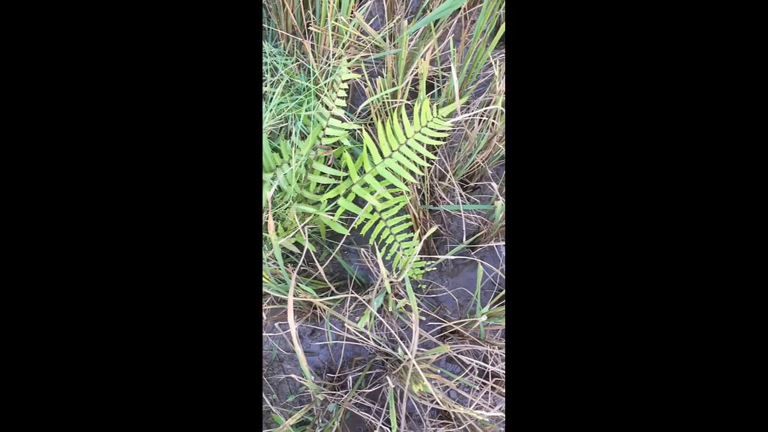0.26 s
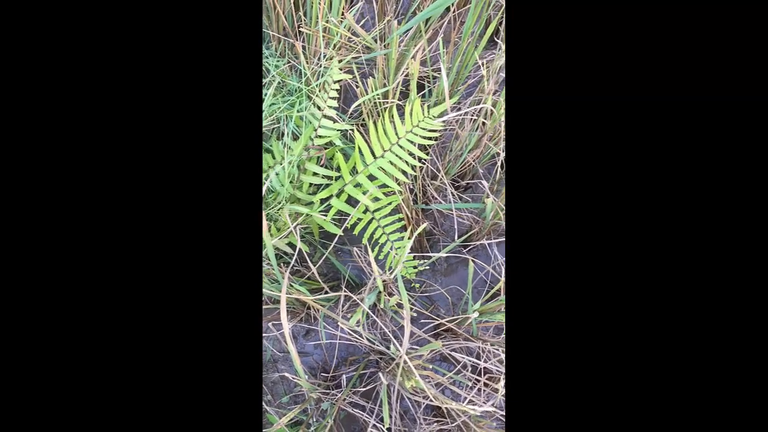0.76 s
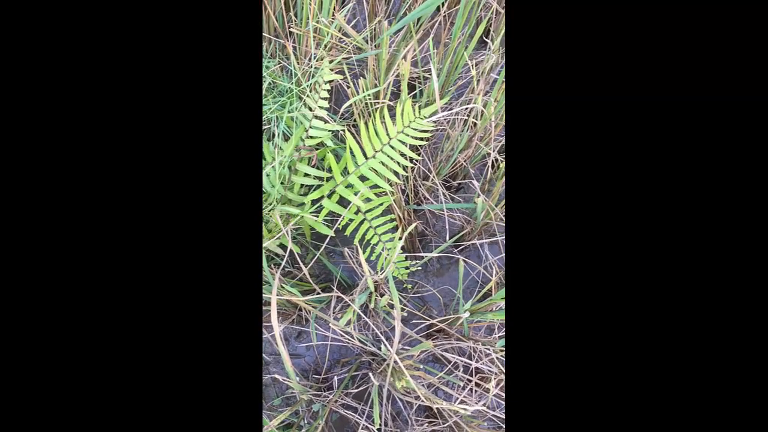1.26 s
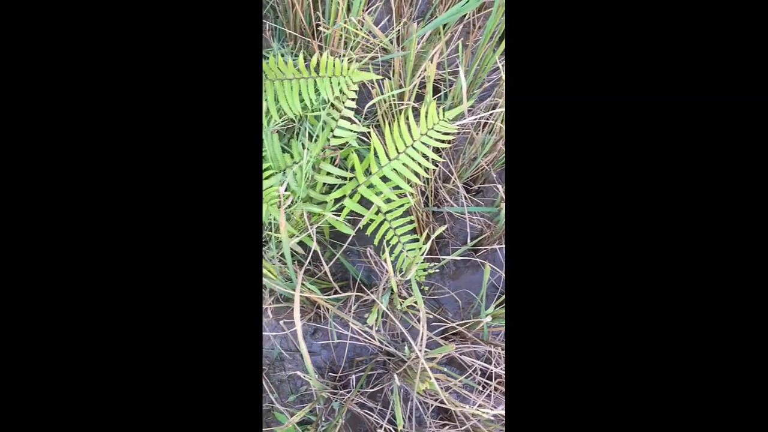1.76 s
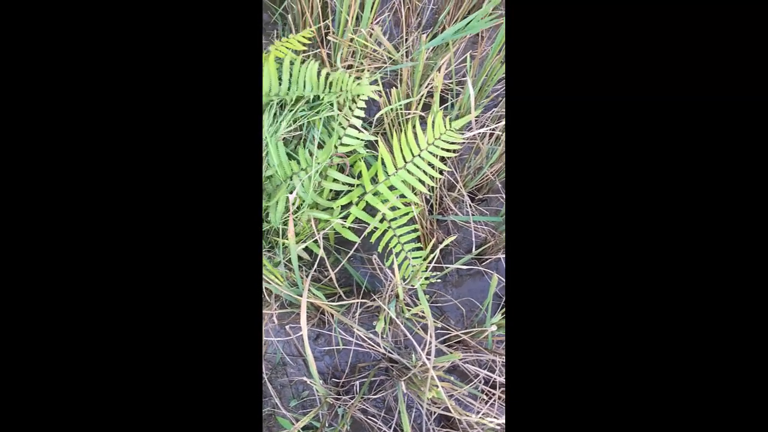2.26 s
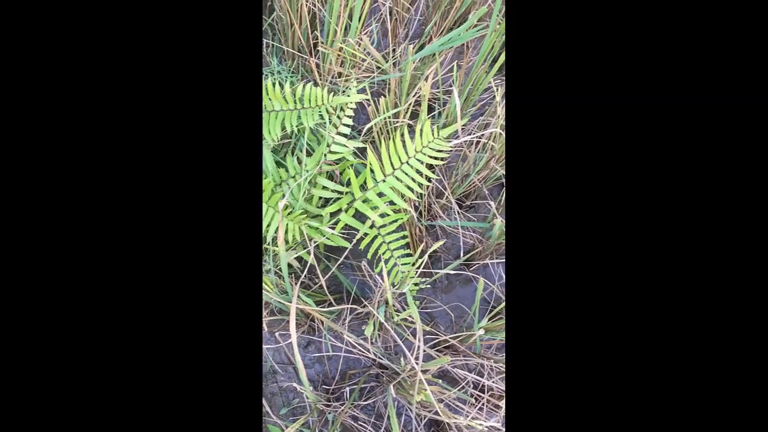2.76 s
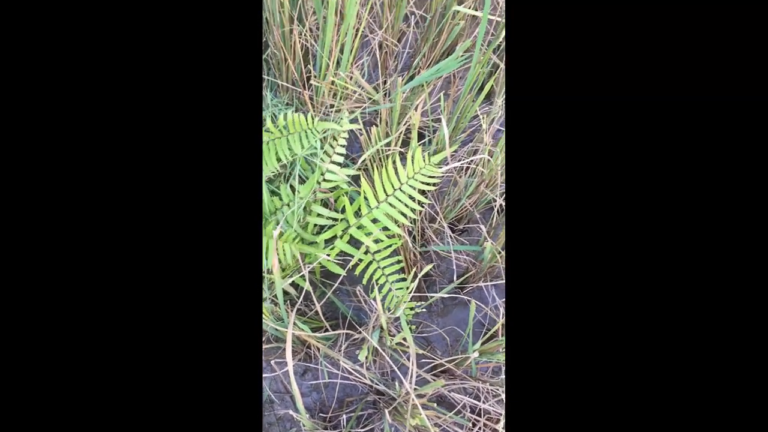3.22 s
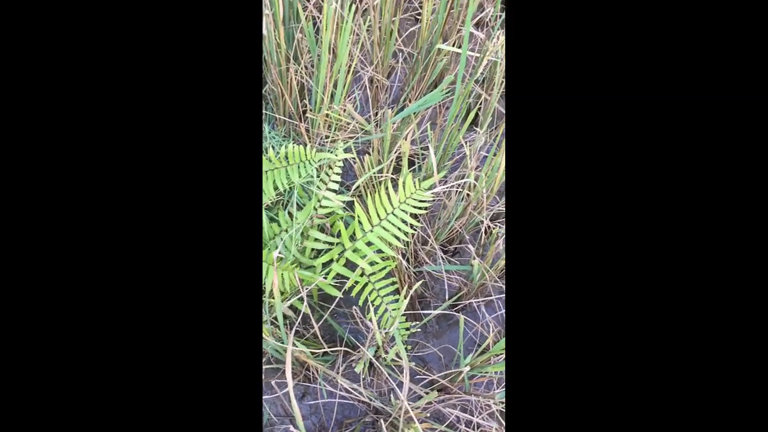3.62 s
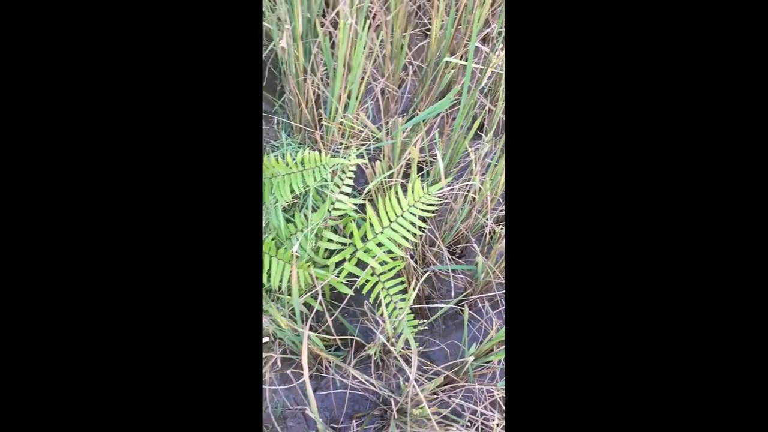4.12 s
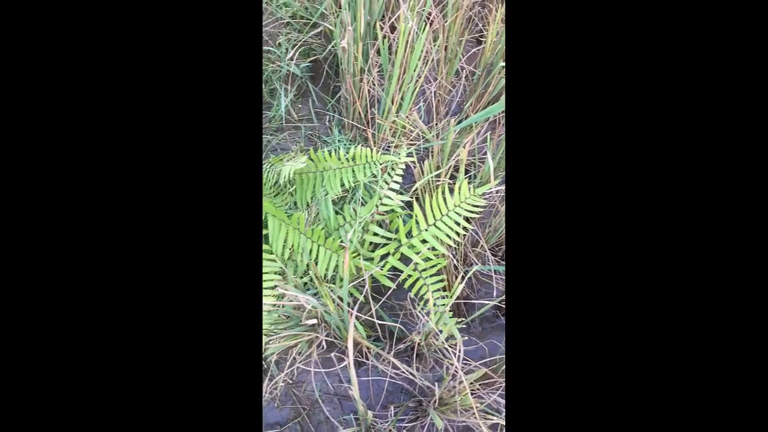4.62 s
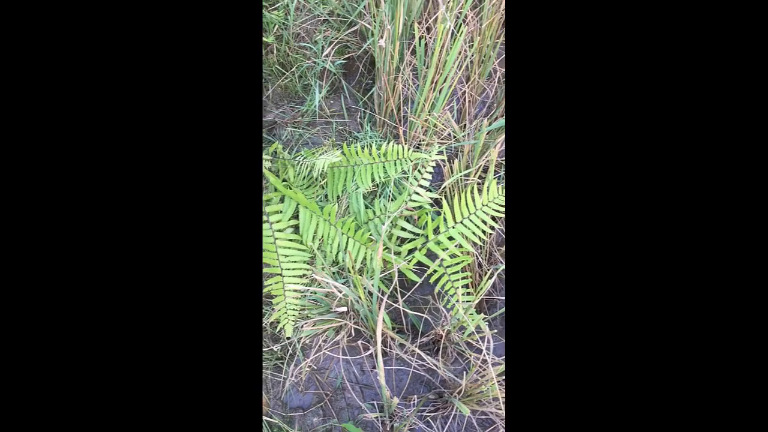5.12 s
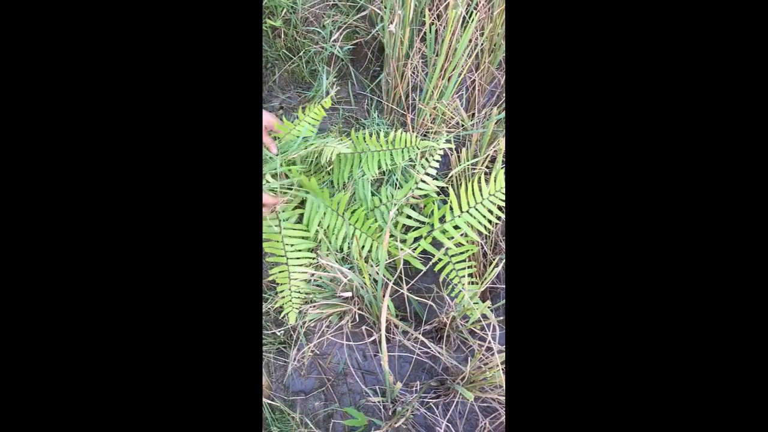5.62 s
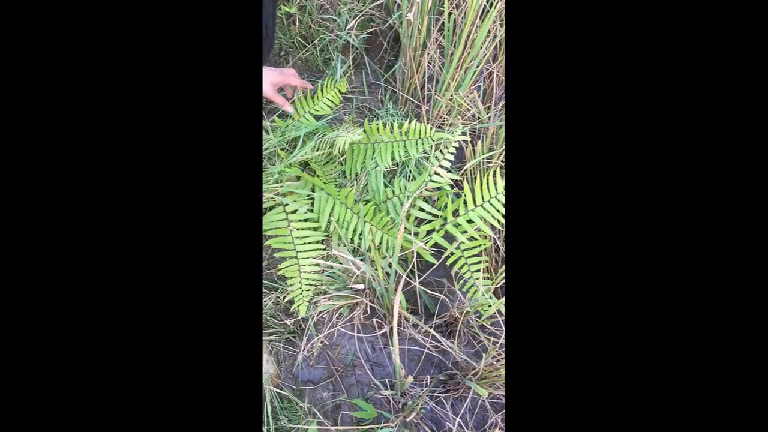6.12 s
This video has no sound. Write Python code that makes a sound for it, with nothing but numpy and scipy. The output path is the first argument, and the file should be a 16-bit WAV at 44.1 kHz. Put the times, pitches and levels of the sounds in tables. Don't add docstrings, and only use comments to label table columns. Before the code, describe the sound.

A quiet wet field, heard close on a mono phone microphone: faint steady hiss and thin, very high cricket chirps. From about 0.2 s hands brush leaves with light ticks, the scraping growing by 0.5 s. Between 0.7 and 0.95 s a tight cluster of sharp stalk cracks, leafy swish, low knocks and muddy gulps forms the first plunge. From 1.2 to 2.8 s there are softer rustles, separate dry snaps and small plops, with a swish near 2.0. Around 2.5 s a cricket starts paired chirps, clearest near 4 s; 2.9 to 4 s is calmer, with bubbles popping. A sharp crack at 4.1 s leads into the longest crunch, 4.2 to 4.7 s, full of snapping stalks, hollow mud knocks, gulps and plops. After 4.8 s motion fades; a bright click and pop at 5.2 s, then sparse drips, trickle, faint brushing and crickets to 6.4 s.

```python
import sys
import numpy as np
from scipy import signal
from scipy.fft import rfft, irfft, next_fast_len
from scipy.io import wavfile
from scipy.ndimage import uniform_filter1d

SR = 44100
rng = np.random.default_rng(int(sys.argv[2]) if len(sys.argv) > 2 else 0)


def volts(x):
    e = np.asarray(x, float) / 20
    return 10 ** e


def transcribe(u):
    v = np.clip(np.atleast_2d(u).T, -1, 1)
    q = np.round(v * 32767).astype(np.int16)
    wavfile.write(sys.argv[1], SR, q)


N = 281358
T = np.arange(N) / SR


def level(x, db):
    return x * volts(db) / np.sqrt(np.mean(x ** 2))


def colour(x, points):
    hz, db = np.transpose(points)
    size = next_fast_len(N)
    log_hz = np.log(np.arange(size // 2 + 1) * SR / size + 1)
    gain = volts(np.interp(log_hz, np.log(hz), db))
    return irfft(rfft(x, size) * gain, size)[:N]


def band(x, lo_hz, hi_hz):
    edges_hz = [lo_hz, min(hi_hz, SR / 2.1)]
    return signal.sosfilt(signal.butter(2, edges_hz, "band", fs=SR, output="sos"), x)


def walk(rate):
    hold = int(SR / rate)
    held = np.repeat(rng.standard_normal(size=600), hold)[:N]
    return np.sqrt(2) * uniform_filter1d(uniform_filter1d(held, hold), hold)


def slips(rate, spread_db, t60):
    strength_db = spread_db * np.minimum(rng.exponential(size=N), 2.8)
    starts = (rng.random(N) < rate / SR) * volts(strength_db)
    decay = 1000 ** (-1 / (t60 * SR))
    return level(signal.lfilter([1], [1, -decay], starts), 0)


def add(out, s, sound):
    i = max(int(s * SR), 0)
    out[i:i + len(sound)] += sound[:N - i]


def field():
    # hz, density_db [dB per Hz]
    hiss_points = [(18, -41), (30, 3.5), (124, -3), (392, -11), (775, -16.5), (1210, -5), (1380, -7),
                   (5680, -36), (7200, 0.5), (7990, -13), (8870, -17), (10400, -17.5), (15800, -13)]
    hiss = colour(rng.standard_normal(N), hiss_points)
    return level(hiss * volts(1.5 * walk(3.24)), -64)


def stroke(hz, length, arch_hz, rough):
    u = np.linspace(0, 1, int(length * SR))
    pitch_hz = hz - arch_hz * (2 * u - .92) ** 2
    teeth = 1 + rough * 11.0 * uniform_filter1d(rng.standard_normal(size=4000), size=40)[:len(u)]
    swell = np.sin(np.pi * u ** 0.85) ** 0.41
    return np.sqrt(2) * swell * teeth * np.sin(2 * np.pi * np.cumsum(pitch_hz) / SR)


def paired_cricket(out):
    # time_s, level_db
    pair_level = [
        (2.5, -62),
        (3.3, -59),
        (3.8, -53.5),
        (4.15, -51.5),
        (4.7, -56),
        (5.0, -54.5),
        (5.4, -57.5),
        (6.3, -60),
    ]
    times_s, levels_db = np.transpose(pair_level)
    start_s, every_s, gap_s = 2.536, .309, .078
    for k in range(26):
        second = k % 2
        s = start_s + every_s * (k // 2) + gap_s * second
        db = np.interp(s, times_s, levels_db) + 4.0 + 0.86 * second
        add(out, s - .014, volts(db) * stroke(7235, 0.031, 165, 0.12))


def single_chirps(out):
    chirps = {7430: [(.073, -62), (.02, -70), (0.171, -62), (.339, -58), (3.339, -78), (3.419, -66),
              (3.46, -73), (3.509, -69), (3.607, -70), (3.654, -62), (3.695, -63), (3.825, -56),
              (5.169, -65), (5.359, -75), (5.561, -69), (5.75, -61), (5.976, -63), (6.129, -64),
              (6.167, -60.5), (6.355, -65), (3.872, -66), (5.022, -67), (5.21, -75), (5.395, -66),
              (5.785, -67), (6.315, -72)], 7760: [(.084, -69), (.125, -60), (3.363, -68), (3.5, -67),
              (3.54, -61.5), (3.715, -65), (3.755, -74)]}
    for hz, rows in chirps.items():
        for s, db in rows:
            add(out, s - .013, volts(db + 1.5) * stroke(hz, 0.031, 60, .3))


def trills():
    # start_s, end_s, level_db
    trill_rows = [
        (0.03, 0.167, -63),
        (3.38, 3.458, -62),
        (3.56, 3.697, -63.5),
        (3.794, 3.9, -58),
        (5.44, 5.5, -75),
        (2.915, 2.995, -62),
        (6.13, 6.184, -71),
        (6.274, 6.42, -76),
    ]
    gate, bend_hz = np.zeros((2, N))
    for start, end, db in trill_rows:
        across = (2 * T - start - end) / (end - start)
        gate += volts(db) * np.sqrt(np.clip(1. - across ** 2, 0, 1))
        bend_hz += (T > start) * (T < end) * 800 * (T - (start + end) / 2)
    wing = 2 * np.pi * 66.0 * T + 1.1
    beats = np.clip(np.sin(wing) + 0.5, 0, None) ** 0.89
    pitch_hz = 9090 + bend_hz + 120 * np.cos(wing) + 40 * walk(65)
    return 2.1 * gate * beats * np.sin(2 * np.pi * np.cumsum(pitch_hz) / SR)


def crickets():
    out = np.zeros(N)
    paired_cricket(out)
    single_chirps(out)
    out += trills()
    far = level(band(rng.standard_normal(N), 8550, 9150), 0)
    out += volts(-73.0 + 2.2 * walk(14)) * far
    tail = rng.standard_normal(size=3000)
    tail *= np.exp(-T[:len(tail)] / 0.045)
    return out + volts(-36.5) * signal.fftconvolve(out, tail)[:N]


def pushes(base_db, s, db, rise, fall):
    t = T[::64, None]
    before = (s - t) / np.maximum(rise, .01)
    after = (t - s) / np.maximum(fall, .01)
    push_db = db - 10 * np.maximum(before, after)
    push_power = np.interp(T, t[:, 0], volts(2 * push_db).sum(axis=1))
    return 10 * np.log10(volts(2 * base_db) + push_power)


def hands():
    # time_s, effort_db, height_db (thin blades over fronds)
    drag = [(.1, -64.5, -6.5), (.32, -57, 6.5), (.52, -43.5, 0.5), (.7, -40, 0), (.77, -50, 3),
            (1.35, -47.5, 1), (1.88, -59.5, -0.5), (2.3, -51, -0.5), (2.84, -54, -1), (2.92, -68, 0.5),
            (3.25, -62, -2), (3.5, -68.5, 0.5), (3.7, -64, 3.5), (3.92, -50.5, 4), (4.24, -44.5, 0.5),
            (5.04, -70, 5), (5.7, -69, 4.5), (6.1, -69.5, 2)]
    # peak_s, level_db, rise_s, fall_s (both over 10 dB)
    brushes = [(.227, -44, 0.033, 0.037), (.383, -53.5, 0.049, 0.23), (.515, -42.5, 0.1, 0.042),
               (.718, -46.5, 0.14, 0.077), (0.915, -35, 0.065, 0.067), (.966, -33, 0.092, 0.049),
               (1.237, -48.5, 0.37, 0.092), (1.493, -45.5, 0.092, 0.066), (1.656, -51.5, 0.12, 0.23),
               (1.783, -48, 0.01, 0.11), (1.981, -40.5, 0.045, 0.062), (2.111, -39.5, 0.063, 0.042),
               (2.168, -42.5, .015, 0.013), (2.291, -45, 0.13, 0.055), (2.983, -52, 0.011, 0.011),
               (2.574, -46.5, 0.03, 0.027), (2.692, -43, 0.041, 0.037), (2.858, -50, 0.028, .03),
               (3.033, -51, 0.064, 0.1), (3.117, -45, 0.051, 0.086), (3.304, -53, 0.076, 0.026),
               (4.306, -37, 0.032, 0.13), (4.398, -42, 0.27, 0.072), (4.61, -44, 0.17, 0.17),
               (4.821, -55, .15, 0.17), (5.14, -59.5, 0.023, 0.23), (5.22, -57.5, 0.14, 0.083),
               (5.543, -57, 0.18, 0.44), (5.859, -53.5, 0.076, 0.23), (6.03, -54.5, 0.036, 0.066),
               (6.202, -57.5, 0.041, 0.015), (4.945, -56.5, 0.07, 0.021)]
    # peak_s, mud_db, bent_stalks_db, rise_s, fall_s
    plunges = [(.515, -63.5, -54.5, 0.24, 0.13), (.914, -44, -40, 0.064, 0.08),
               (.966, -60, -48, .05, 0.054), (2.291, -68, -55, 0.053, 0.11),
               (3.195, -67, -57, 0.048, 0.017), (4.19, -72, -74, 0.16, 0.11),
               (4.306, -51.5, -61, 0.04, 0.1), (4.398, -66, -39, 0.058, 0.049),
               (4.61, -66, -46.5, 0.12, 0.12), (4.645, -64, -66, .03, .04), (6.03, -71, -60, 0.041, 0.15)]
    drag_s, effort_db, height_db = np.transpose(drag)
    scrape_db = pushes(np.interp(T, drag_s, effort_db), *np.transpose(brushes))
    blade_db = scrape_db + np.interp(T, drag_s, height_db)
    s, mud_db, bent_db, rise, fall = np.transpose(plunges)
    carried_db = 10 * np.log10(volts(2 * (scrape_db - 12.5)) + volts(2 * -67))
    stalk_db = pushes(carried_db, s, bent_db, rise, fall)
    push_db = pushes(-74, s, mud_db, rise, fall)
    return scrape_db, blade_db, stalk_db, push_db


def leaves(scrape_db, blade_db, stalk_db):
    # hz, density_db [dB per Hz]
    leaf_points = [(180, -48), (300, -33), (633, -14), (747, -16), (1430, -12), (2020, -3), (3790, 0),
                   (9140, -1.5), (15000, -5.5), (15800, -4)]
    shared, drag, out = slips(300, 4.3, 0.045), walk(33.0), 0
    for hz in 500 * 2 ** np.arange(0, 5.3, .5):
        grain = 0.75 + 0.44 * shared + 0.17 * slips(460, 0.47, 0.0081)
        patch_db = 0.11 * drag + 1.33 * walk(24.93)
        octave = np.log2(hz)
        to_stalk = np.clip(np.log2(2000) - octave, 0, 1)
        to_blade = np.clip(octave - np.log2(5500), 0, 1)
        db = scrape_db + to_stalk * (stalk_db + 13.0 - scrape_db)
        db = db + to_blade * (blade_db + 2.0 - scrape_db)
        rough = rng.standard_normal(N) * grain * volts(patch_db)
        out = out + band(rough, hz / 2 ** 0.27, hz * 2 ** 0.27) * volts(db)
    return volts(3.5) * colour(out, leaf_points)


def mud(push_db):
    lumps = rng.standard_normal(N) * (0.93 + 0.25 * slips(46, 2.4, 0.016))
    return level(band(lumps, 36, 480), -0.61) * volts(push_db)


def droplets(motion_db, low_hz, octaves, turns, gain_db, count):
    out, t = np.zeros(N), np.arange(int(.035 * SR)) / SR
    for when, where, rank in rng.random(size=(count, 3)):
        hz = low_hz * 2 ** (octaves * where)
        db = motion_db[int(when * N)] + gain_db - 5.6 * np.log(rank + 0.063)
        age = t * hz / turns
        ring = np.sin(2 * np.pi * hz * t * (1 + 0.99 * t))
        add(out, when * N / SR, volts(db) * age * np.exp((1 - age ** 2) / 2) * ring)
    return out


def wet_growth(scrape_db, blade_db, stalk_db, push_db):
    frond_db = np.minimum(scrape_db, -42)
    drops = droplets(frond_db, low_hz=1785, octaves=1.6, turns=26.0, gain_db=-16.0, count=700)
    mist = droplets(blade_db, low_hz=5200, octaves=1.6, turns=14.7, gain_db=-7.5, count=900)
    seep = droplets(stalk_db, low_hz=887, octaves=0.763, turns=10.0, gain_db=-12.5, count=260)
    gurgle = droplets(push_db, low_hz=158, octaves=1.6, turns=1.1, gain_db=-20, count=120)
    crackle = droplets(scrape_db, low_hz=1500, octaves=3.7, turns=8.6, gain_db=-19.0, count=2200)
    return drops + mist + seep + gurgle + crackle


def bubbles(rows, rise_s, damp_hz, turns, waver, glide):
    out, t = np.zeros(N), np.arange(int(.08 * SR)) / SR
    for (s, db, hz), noise in zip(rows, rng.standard_normal((len(rows), len(t)))):
        shape = (1 - np.exp(-t / rise_s)) * 1000 ** (-t * (hz + damp_hz) / turns)
        wall = 1 + waver * uniform_filter1d(noise, size=60)
        ring = np.sin(2 * np.pi * hz * t * (1 + glide * t))
        add(out, s, volts(db) * shape / shape.max() * wall * ring)
    return out


def mud_gulps():
    # start_s, peak_db, pitch_hz
    gulp_rows = [(-0.002, -62, 365), (0.35, -64, 696), (0.48, -59, 455), (0.501, -53.5, 620),
                 (0.568, -61, 237), (0.832, -41, 460), (0.835, -44.5, 254), (0.889, -41, 704),
                 (0.898, -45, 292), (0.964, -42, 211), (1.138, -62, 690), (1.498, -63, 303),
                 (1.533, -60, 342), (1.773, -65, 557), (1.945, -64, 430), (2.106, -55.5, 604),
                 (2.128, -61, 360), (2.154, -55, 670), (2.266, -61, 430), (2.275, -58, 600),
                 (2.292, -58, 178), (2.567, -61, 584), (2.707, -58, 593), (2.752, -64, 171),
                 (2.876, -63, 660), (2.918, -65, 183), (3.101, -69, 700), (3.154, -58.5, 383),
                 (3.183, -56, 265), (3.324, -61, 354), (3.405, -62, 260), (3.426, -63, 480),
                 (3.581, -71, 206), (3.783, -65, 700), (3.945, -58, 620), (4.069, -61, 610),
                 (4.13, -62, 238), (4.177, -61, 308), (4.182, -52, 606), (4.204, -53, 560),
                 (4.283, -46, 667), (4.285, -39.5, 298), (4.354, -43, 623), (4.356, -46, 328),
                 (4.376, -46, 650), (4.433, -42, 570), (4.607, -50, 145), (4.621, -51, 560),
                 (4.907, -65, 288), (4.99, -66, 520), (5.121, -65, 617), (5.296, -72, 161),
                 (5.462, -66, 392), (5.563, -65, 406), (5.645, -61, 646)]
    return bubbles(gulp_rows, rise_s=0.0061, damp_hz=900, turns=64, waver=2.5, glide=0.25)


def mud_pockets():
    # start_s, peak_db, pitch_hz
    pocket_rows = [(0.176, -47.5, 1203), (0.204, -46.5, 1170), (0.34, -56, 1230), (1.081, -47, 194),
                   (1.275, -50, 1200), (2.278, -61, 1620), (2.899, -52.5, 1385), (3.031, -57, 1115),
                   (4.757, -55, 148), (3.189, -52, 544), (3.233, -53.5, 1195), (3.254, -55.5, 364),
                   (3.32, -48, 1270), (3.336, -46, 1150), (3.352, -52, 1017), (3.417, -52.5, 1210),
                   (3.459, -57, 1580), (3.585, -62, 484), (3.664, -54.5, 1280), (3.92, -52.5, 1220),
                   (4.756, -53.5, 596), (5.122, -49, 1586), (5.2128, -39.5, 1750), (5.3, -54.5, 1010),
                   (5.463, -60, 1195), (5.743, -61, 1240), (5.622, -56, 690), (5.697, -52, 1236),
                   (6.025, -57, 504), (6.268, -60, 1010)]
    pops = bubbles(pocket_rows, rise_s=0.0025, damp_hz=910, turns=89, waver=3.3, glide=0.3)
    return volts(-0.5) * pops


def snaps():
    # start_s, peak_db, ring_hz, spray_db
    groping = [(0.203, -33, 6180, -51), (0.239, -34, 4220, -51), (0.261, -36, 2540, -52),
               (0.2915, -48, 6280, -36), (1.23, -39, 3140, -31), (1.363, -27, 5900, -35),
               (1.4547, -31, 4350, -40), (1.499, -23, 4000, -52), (1.6604, -32, 5450, -36),
               (1.7803, -31, 3520, -46), (2.088, -27, 3710, -53), (2.1362, -27.5, 3780, -34),
               (2.558, -30, 3600, -50), (2.568, -28, 3040, -45), (2.5838, -24, 6000, -46),
               (2.661, -33.5, 3700, -44), (2.683, -28, 3300, -40), (3.2097, -46, 8600, -51),
               (3.307, -50, 3100, -43.5), (4.1222, -17, 3330, -25.5), (4.2037, -24.5, 2380, -31),
               (4.7643, -27.5, 1710, -35), (4.756, -28.5, 5210, -45), (4.814, -33, 5800, -31.5),
               (5.1288, -32.5, 3680, -50), (5.142, -36, 4310, -58), (5.2135, -23, 2770, -63),
               (5.4627, -43, 5000, -48), (5.6391, -41, 3950, -48), (5.9248, -33, 7860, -37),
               (5.681, -41, 7800, -50)]
    first_plunge = [(0.5603, -46, 4100, -30), (0.5843, -41, 6430, -29), (0.681, -20.5, 2660, -51),
                    (0.712, -46, 2320, -32), (0.7213, -19.5, 3000, -24.5), (0.797, -16, 2630, -29),
                    (0.8350, -15, 2720, -26.5), (0.8385, -14, 2870, -35), (0.8641, -15, 2600, -28),
                    (0.8670, -18, 2900, -33), (0.8902, -15, 2320, -21), (0.9014, -18, 2400, -28),
                    (0.8981, -17.5, 1900, -40), (0.872, -23, 2600, -32), (.9224, -9.5, 2440, -21),
                    (0.9348, -23, 6060, -30), (1.0807, -29, 6940, -28)]
    second_plunge = [(4.1673, -31, 3750, -52), (4.178, -32, 5820, -28), (4.227, -29, 5850, -41),
                     (4.2598, -15.5, 3670, -29.5), (4.2841, -24, 2420, -38), (4.2883, -16, 3300, -24.5),
                     (4.313, -15.5, 5700, -32), (4.3298, -14.5, 2160, -25.5), (4.361, -15.5, 5700, -24.5),
                     (4.371, -23, 2300, -29), (4.3822, -15.5, 2520, -35), (4.39, -19, 2930, -29),
                     (4.401, -14.5, 2760, -32), (4.418, -15.5, 6580, -30), (4.4332, -21.5, 2680, -34),
                     (4.444, -19, 3320, -32), (4.468, -19.5, 3240, -29), (4.479, -22, 4440, -29.5),
                     (4.4929, -26, 4710, -34), (4.5467, -25, 3000, -32.5), (4.56, -19, 3740, -31.5),
                     (4.5322, -25, 5560, -36), (4.8177, -32, 6460, -41), (4.591, -17, 3050, -41),
                     (4.611, -17, 2880, -24.5), (4.6236, -17.5, 2140, -33), (4.656, -19, 4500, -31.5),
                     (4.6868, -26, 3970, -31), (4.6975, -26, 3000, -34), (4.587, -22, 2480, -45),
                     (4.54, -24, 2270, -45), (4.6542, -26, 2500, -42), (4.4005, -13.5, 4900, -40),
                     (4.4298, -23, 2600, -34), (4.6788, -28, 6000, -40), (4.252, -23, 4500, -47),
                     (4.4083, -26, 1500, -32)]
    crack, tear, spray, thud = np.zeros((4, N))
    t = np.arange(int(.06 * SR)) / SR
    tick = (1 - np.exp(-t / 0.0003)) * np.exp(-t / 0.00055)
    fade = (1 - np.exp(-t / 0.00022)) * np.exp(-t / 0.0056)
    for rows, knock_db in ((groping, -25), (first_plunge, -23.5), (second_plunge, -19)):
        for s, db, hz, spray_db in rows:
            thud_db = (db + spray_db) / 2 + knock_db - 10.5 * np.log2(hz / 2500)
            fibres, drops, mud_noise = rng.standard_normal((3, len(t)))
            cycles = t * hz / 1.25
            ring = np.sin(2 * np.pi * hz * t) * cycles * np.exp((1 - cycles ** 2) / 2)
            torn = band(fibres * (fade + 1.8 * tick), 1450, 1400 + 1.14 * hz)
            add(crack, s + .0006, volts(db - 5.0) * ring)
            add(tear, s + .0004, volts(db - 9.0) * torn)
            add(spray, s + 0.00045, volts(spray_db) * drops * (fade + 3.5 * tick))
            add(thud, s, volts(thud_db + 17.5) * mud_noise * np.exp(-t / 0.0032))
    hollow = 1.25 * band(thud, 520, 590)
    return crack + hollow + band(tear, 1080, 6300) + band(spray, 4750, 11600) + band(thud, 68, 820)


def frond_drips():
    # (the one low row, 193 Hz, is an air pocket in the mud)
    drip_rows = [(0.365, -64, 2600), (0.3794, -58, 3020), (1.4644, -41, 4600), (2.4037, -43.5, 3270),
                 (2.678, -38.5, 3280), (3.0344, -43.5, 3450), (3.244, -52, 4000), (3.299, -48, 3820),
                 (3.7065, -55, 4420), (5.1694, -57, 2200), (5.3228, -56, 4310), (5.54, -55, 3730),
                 (4.47, -54, 193), (5.7994, -60, 4030), (5.855, -51, 3160), (6.027, -46, 4040),
                 (6.0494, -52, 3540), (6.0944, -50, 3520), (6.114, -57, 2150), (6.1744, -55, 3430),
                 (6.204, -59, 3320)]
    drips = bubbles(drip_rows, rise_s=0.0025, damp_hz=910, turns=89, waver=3.3, glide=0.3)
    return volts(-0.5) * drips


def water_plops():
    # start_s, peak_db, pitch_hz
    plop_rows = [(0.49, -50, 1026), (0.586, -56, 1400), (0.833, -48, 1126), (0.834, -41.5, 860),
                 (0.862, -44, 1040), (0.968, -48, 896), (1.078, -55, 1390), (1.225, -58, 1105),
                 (1.361, -58, 970), (1.673, -59, 1220), (1.686, -57, 1620), (1.876, -58, 1210),
                 (1.984, -53.5, 1060), (2.017, -54, 1500), (2.133, -60, 1360), (2.164, -57, 1360),
                 (2.262, -55, 1590), (2.265, -66, 970), (2.413, -61, 1190), (2.474, -60, 1260),
                 (2.563, -52, 1490), (2.695, -52, 1470), (2.783, -62, 1140), (3.046, -58, 1210),
                 (3.087, -56, 1240), (3.185, -56, 903), (3.938, -54, 1146), (4.056, -52, 1620),
                 (4.118, -64, 1000), (4.182, -65, 930), (4.285, -41, 1390), (4.38, -46, 1105),
                 (4.404, -41.5, 1415), (4.621, -39, 1058), (4.689, -45, 1410), (4.891, -62, 1006),
                 (4.954, -60, 1550), (5.497, -61, 1210), (5.557, -61, 1000), (5.57, -60, 1470)]
    plops = bubbles(plop_rows, rise_s=0.0039, damp_hz=800, turns=73, waver=5.5, glide=0.23)
    return volts(0.5) * plops


def frond_trickle():
    # start_s, peak_db, pitch_hz
    trickle_rows = [(4.898, -53, 4270), (4.942, -46, 4800), (5.129, -69, 2153), (5.129, -56, 4430),
                    (5.129, -58, 3170), (5.128, -58, 2860), (5.138, -59, 2530), (5.139, -49, 4320),
                    (5.2128, -40.5, 4520), (5.2135, -47, 3080), (5.261, -57, 4130), (5.264, -57, 3660),
                    (5.392, -60, 1980), (5.412, -66, 3100), (5.519, -62, 3660), (5.569, -52, 2610),
                    (5.618, -65, 2627), (5.622, -58, 3100), (5.637, -47.5, 3970), (5.641, -61, 2000),
                    (5.682, -58, 3200), (5.689, -55, 2390), (5.689, -60, 4608), (5.699, -56, 3600),
                    (5.727, -59, 4435), (5.802, -62, 2620), (5.853, -54, 3950), (5.86, -52, 2220),
                    (5.921, -55, 2360), (5.93, -60, 3850), (6.001, -50, 3350), (6.026, -60, 3050),
                    (6.027, -55, 2000), (6.033, -52, 3480), (6.077, -57, 2600), (6.078, -56, 3488),
                    (6.1, -56, 1937), (6.141, -58, 3337), (6.178, -59, 4608), (6.21, -57, 3208),
                    (6.238, -60, 2370), (6.26, -68, 1744), (6.274, -64, 4330), (6.312, -64, 2350),
                    (6.318, -65, 4370)]
    return bubbles(trickle_rows, rise_s=0.0011, damp_hz=1500, turns=210, waver=4.9, glide=0.44)


def scene():
    scrape_db, blade_db, stalk_db, push_db = hands()
    mono = field() + crickets()
    mono += leaves(scrape_db, blade_db, stalk_db) + mud(push_db)
    mono += wet_growth(scrape_db, blade_db, stalk_db, push_db)
    mono += mud_gulps() + mud_pockets() + snaps()
    mono += frond_drips() + water_plops() + frond_trickle()
    return np.array([mono, mono])


def band_limit(x):
    return signal.sosfilt(signal.butter(12, 16990, fs=SR, output="sos"), x)


def record(dry):
    # centre_hz, width_hz, depth_db
    casing_dips = [(4960, 290, -3.5), (7880, 380, -2), (10490, 750, -4)]
    f = np.arange(N // 2 + 1) * SR / N
    dips_db = sum(db * np.exp(-((f - hz) / width) ** 2) for hz, width, db in casing_dips)
    heard = irfft(rfft(dry) * volts(dips_db) * (f < 15900), N)
    bass_cut = signal.butter(5, 46, "high", fs=SR, output="sos")
    return band_limit(signal.sosfilt(bass_cut, heard))


dry = scene()
out = record(dry)
transcribe(out)
```